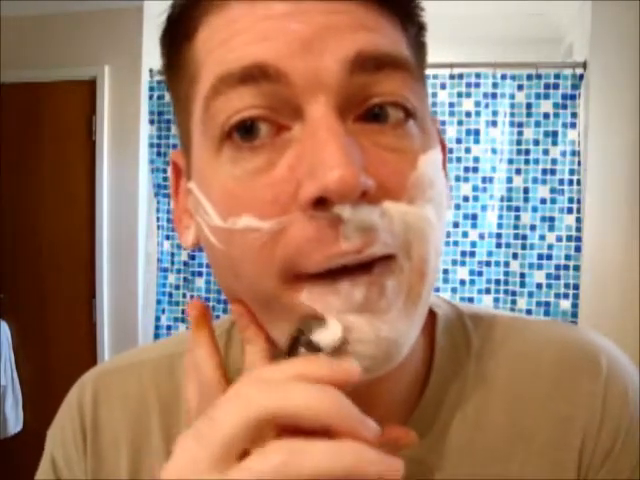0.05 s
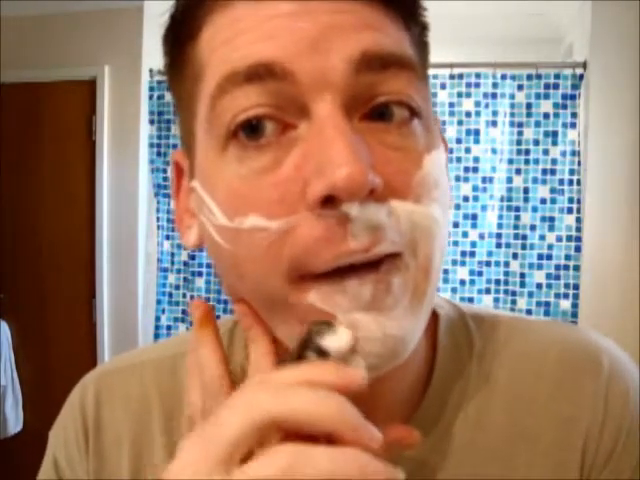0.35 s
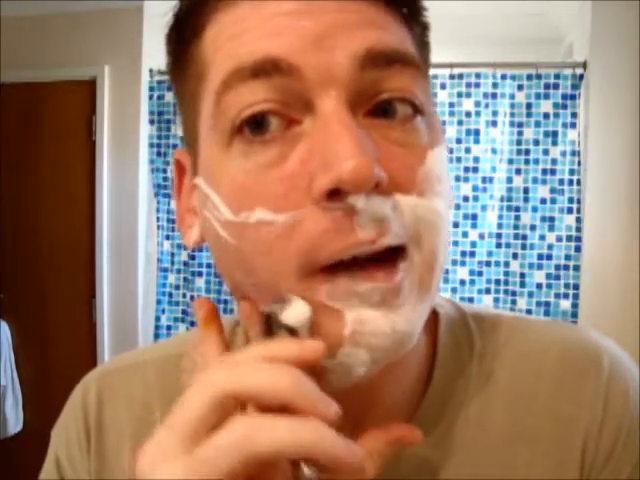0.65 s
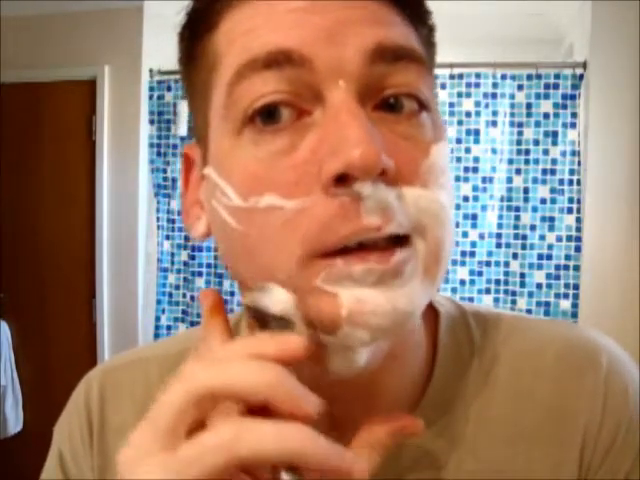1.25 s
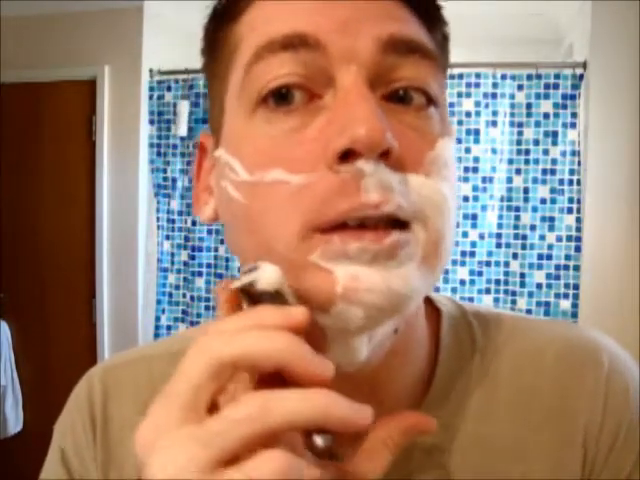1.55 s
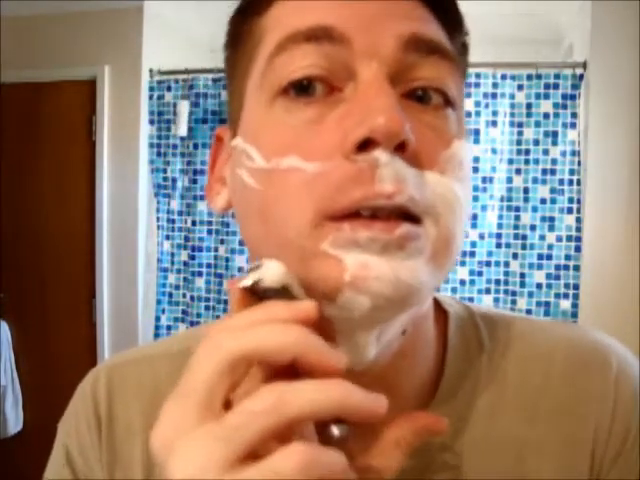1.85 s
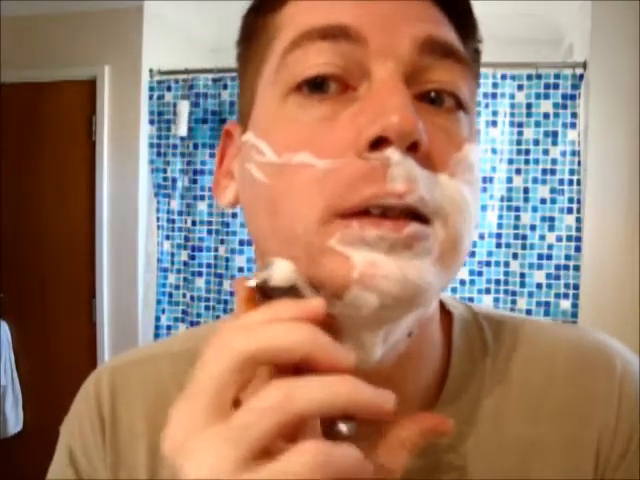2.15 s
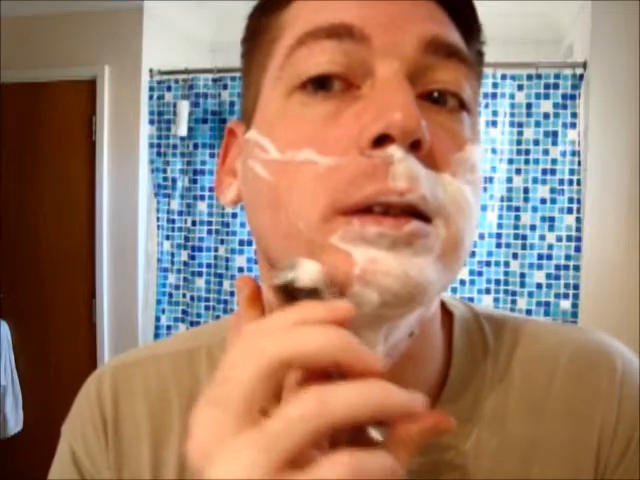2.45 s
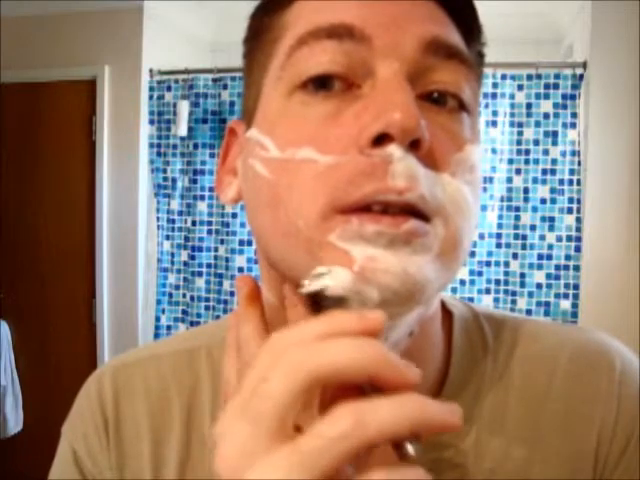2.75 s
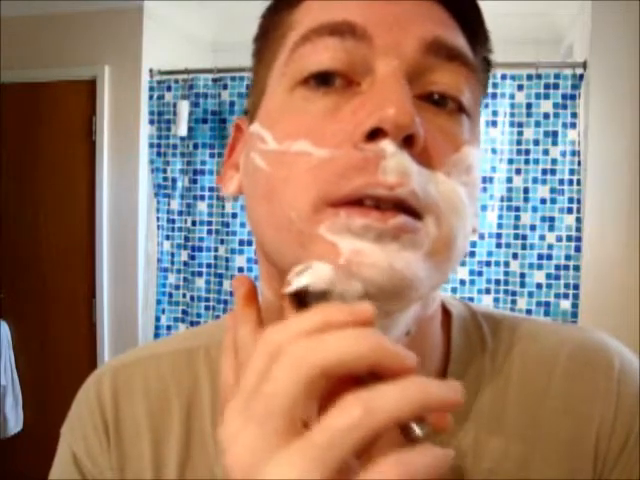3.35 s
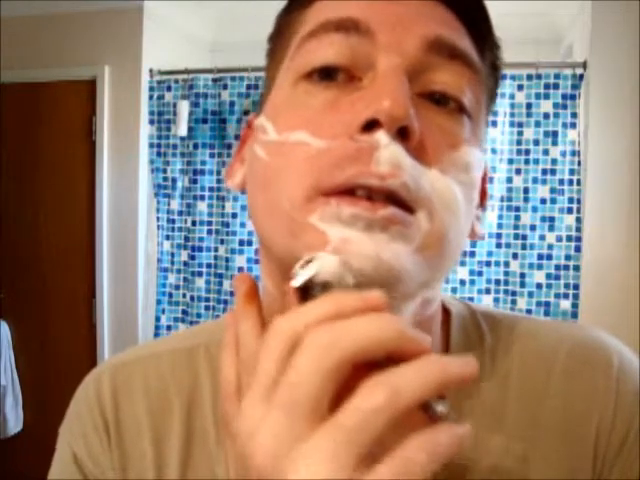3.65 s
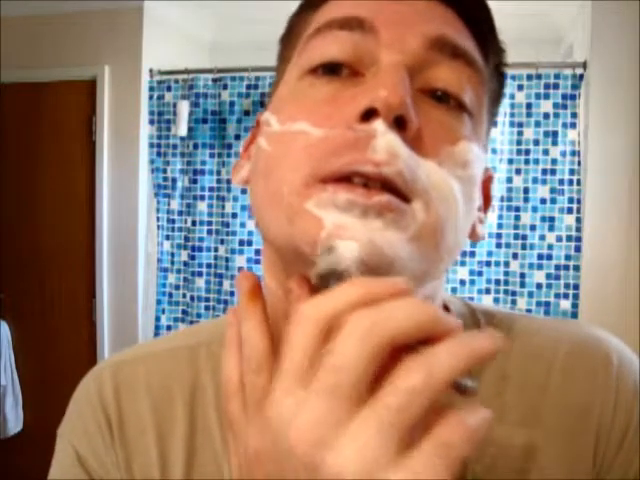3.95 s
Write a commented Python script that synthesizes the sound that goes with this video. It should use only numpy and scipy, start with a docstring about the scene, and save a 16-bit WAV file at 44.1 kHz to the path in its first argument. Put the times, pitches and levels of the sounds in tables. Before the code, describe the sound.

A razor scrapes lathered stubble in short, hissy strokes with tiny blade ticks, close to the microphone in a small tiled bathroom. The strokes lighten midway, then grow quicker and louder, while a ventilation fan hums throughout.

```python
"""Shaving in a small tiled bathroom, one microphone close to the razor. A ventilation fan hums and
blows from the start. Short strokes cross lathered stubble, each a dense run of hair snaps that hiss
and ring the razor head; the blade ticks where it catches, and the tiles add a short tail. A low rumble
swells before 1 s. Around 2 s the strokes are light and squeak faintly. Near 3 s the rumble swells
again, and the strokes, about four a second, grow to their loudest."""
import sys
import numpy as np
from scipy import signal
from scipy.fft import rfft, irfft
from scipy.io import wavfile

SR = 44100
rng = np.random.default_rng(int(sys.argv[2]) if len(sys.argv) > 2 else 0)


def transcribe(u):
    """Save the signal u as a 16-bit wav file named by the first command-line argument.

    u: samples, shape (n,) or (channels, n), limited to [-1, 1]; the rate is SR.
    q: integer samples, one column per channel.
    """
    v = np.clip(np.atleast_2d(u).T, -1, 1)
    q = np.round(v * 32767).astype(np.int16)
    wavfile.write(sys.argv[1], SR, q)


N = 176400
T, HZ = np.arange(N) / SR, np.fft.rfftfreq(N, 1 / SR)
TOP_HZ = 10090  # upper edge of everything the microphone hears


def amp(db):
    """Decibels to gain."""
    return 10 ** (np.asarray(db) / 20)


def unit(x):
    """Scales to rms 1."""
    return x / np.sqrt(np.mean(abs(x) ** 2) + 1e-20)


def colour(x, points):
    """Shapes x to rms 1 with a spectrum joined on a log-frequency axis and cut at TOP_HZ."""
    hz, db = np.transpose(points)
    gain = amp(np.interp(np.log(HZ + 1), np.log(hz), db))
    return unit(irfft(rfft(x) * gain * (HZ < TOP_HZ), N))


def drift(rate_hz):
    """Slow random motion of rms 1."""
    return unit(irfft(rfft(rng.standard_normal(N)) * np.exp(-(HZ / rate_hz) ** 2), N))


# Air through the fan, at the back of the room (frequency [Hz], relative level [dB])
AIR_SPECTRUM = [(22, -23), (40, -23), (60, -11), (80, -7.5), (108, -18), (124, -4.5), (140, -15), (163, -2),
                (185, -7), (210, -4.5), (232, 0), (260, 3), (285, -1.5), (380, -1.5), (450, -5.5),
                (620, -4.5), (780, -6), (1150, -12), (1400, -12), (2200, -14.5), (3200, -16.5), (5000, -19),
                (8000, -20.5), (10000, -22.5)]
def fan_air(level_db=-51.5, flicker_db=1.68, flicker_hz=93):
    """The fan blows an even rush of air whose treble flickers slightly."""
    air = colour(rng.standard_normal(N), AIR_SPECTRUM)
    treble = irfft(rfft(air) * (HZ > 5100), N)
    flicker = amp(flicker_db * drift(flicker_hz))
    return amp(level_db) * (air - treble + treble * flicker)


# Tones of the fan's motor and blades (frequency [Hz], rms level [dB], unsteadiness [0-1])
FAN_TONES = [ (43, -80, .7), (100, -71, .15), (200, -51.3, .05), (242.3, -58.2, .45), (300.3, -63.7, .2),
             (476, -73, .4), (500.3, -71.5, .3), (558, -73, .4), (600.3, -70.5, .3), (657, -64.7, .2),
             (757, -70.3, .45), ]
def fan_hum(waver_hz=4.5):
    """The motor and blades hum behind the razor, each tone wavering by its own amount."""
    hum = np.zeros(N)
    for hz, db, unsteady in FAN_TONES:
        wander = unit(drift(waver_hz) + 1j * drift(waver_hz))
        waver = np.sqrt(1 - unsteady ** 2) + unsteady * wander
        tone = np.exp(2j * np.pi * (hz * T + rng.random()))
        hum += amp(db) * unit((waver * tone).real)
    return hum


# A low rumble in the background (time [s], rms level [dB])
RUMBLE_LEVELS = [(0, -84), (.55, -78), (.65, -66), (1.05, -68), (1.2, -72.5), (2.85, -80.5), (2.99, -62),
                 (3.18, -71), (3.3, -73), (4, -73)]
def rumble(pitch_hz=74.9, wander_hz=3.14):
    """A low drone of wandering pitch that swells twice."""
    hz = pitch_hz + wander_hz * drift(12.7)
    level_db = np.interp(T, *np.transpose(RUMBLE_LEVELS))
    return amp(level_db) * unit(np.sin(2 * np.pi * np.cumsum(hz) / SR))


def tile_echo(x, t60_s=.25, level_db=-13.5):
    """The tiled walls return a short, dense tail, reaching the microphone 4 ms after the direct sound."""
    t = T[:SR // 2]
    tail = rng.standard_normal(len(t)) * amp(-60 * t / t60_s) * (t > .004)
    return amp(level_db) * signal.fftconvolve(x, tail / np.linalg.norm(tail))[:N]


# Faint squeaks on the light strokes (start [s], length [s], level [dB])
BLADE_SQUEAKS = [(1.915, .048, -59.5), (2.205, .065, -61), (2.468, .06, -62)]
def squeak(start, length, level_db, pitch_hz=5750, jitter_hz=90, flutter_hz=220, rough_db=3):
    """On a light stroke the blade chatters at one thin, unsteady pitch."""
    hz = pitch_hz + jitter_hz * drift(flutter_hz)
    arch = np.sqrt(abs(np.sin(np.pi * np.clip((T - start) / length, 0, 1))))
    tone = np.sin(2 * np.pi * np.cumsum(hz) / SR) * amp(rough_db * drift(flutter_hz))
    return amp(level_db) * arch * unit(tone)


def hair_snaps(fine_per_s=7000, thick_per_s=450, thick_db=-7, spread_db=3.3, drag_db=1.5, drag_s=.007):
    """A dense run of tiny hair snaps of uneven size, with a few thick hairs cracking among them."""
    sizes = amp(spread_db * np.minimum(rng.exponential(1, N), 3.5))
    signs = rng.choice([-1, 1], N)
    fine = unit(signs * sizes * (rng.random(N) < fine_per_s / SR))
    thick = unit(signs * (rng.random(N) < thick_per_s / SR))
    drag = amp(drag_db * drift(1 / drag_s))
    return unit((fine + amp(thick_db) * thick) * drag)


# Modes of the razor head (frequency [Hz], width [Hz], relative level [dB])
HEAD_MODES = [(3560, 220, 2.5), (4270, 100, 1.5), (4680, 160, 2), (5270, 110, -2), (5830, 240, 2),
              (6200, 200, -3.5), (7380, 130, 0), (8680, 200, -6), (9560, 220, -2.5)]
def head_ring(snaps):
    """The snaps set the razor head ringing at its modes."""
    modes = sum(amp(db) / (1 + ((HZ - hz) / width) ** 2) ** 2 for hz, width, db in HEAD_MODES)
    return unit(irfft(rfft(snaps) * modes, N))


# Colour of a hair snap at the microphone (frequency [Hz], relative level [dB])
SNAP_SPECTRUM = [(600, -21), (1400, 0.5), (2400, -1), (3200, 1.5), (4300, 0), (5600, 0), (7000, 0),
                 (8500, -3), (9800, -3)]
def stubble_scrape(snaps):
    """Thousands of snaps a second merge into a hiss."""
    return colour(snaps, SNAP_SPECTRUM)


# The blade catches and rings part of the head (start [s], level [dB], centre [Hz], fade [s])
BLADE_CATCHES = [(0.249, -53.5, 5450, .003), (.2622, -54.5, 5370, .007), (.2734, -50, 5200, .002),
                 (.284, -56, 4160, 0.009), (.2994, -52, 5350, .002), (.6185, -52.5, 3800, .0025),
                 (1.5484, -51, 5850, 0.0018), (1.5613, -47.5, 5950, 0.0018), (2.5184, -52, 5530, .0015),
                 (2.7267, -55, 4690, .0025), (2.7424, -46, 5200, 0.0025), (2.9488, -52, 5400, .0025),
                 (2.962, -49, 4560, 0.0023), (3.1914, -49, 5800, .002), (3.2003, -46, 6150, 0.0028),
                 (3.219, -54, 3520, .004), (3.455, -53, 5900, .005), (3.485, -55.5, 3600, 0.0076),
                 (3.6795, -48, 5600, .002), (3.684, -54.5, 3230, 0.014), (3.9235, -52, 4330, .002),
                 (3.9374, -47, 5850, .002), (3.958, -52, 5700, .005), (3.981, -50.5, 5800, .008)]
def catch(contact_spectrum, start, level_db, centre_hz, fade, rise_s=.0008):
    """A tick or brief rasp as the blade hooks a tuft of stubble; the shorter, the wider its band."""
    t = np.maximum(T - start, 0)
    width_oct = .38 * np.sqrt(.002 / fade)
    band = (HZ < TOP_HZ) / (1 + (np.log2((HZ + 1) / centre_hz) / width_oct) ** 2) ** 2
    envelope = np.minimum(t / rise_s, 1) * np.exp(-t / fade)
    rasp = envelope * irfft(contact_spectrum * band, N)
    return amp(level_db) * np.sqrt(fade * SR / N) * unit(rasp)  # energy of level_db held for one fade


# Razor strokes, close to the microphone
# (start [s], length [s], release [s], level [dB], brightness [dB/octave], ring against scrape [dB])
RAZOR_STROKES = [ (-0.02, 0.075, .021, -53.5, 2.5, -21), (0.246, 0.06, 0.02, -55.5, -1, -14),
                 (0.313, 0.034, 0.032, -56.5, 3.5, -15), (0.608, 0.092, .028, -53, 4, -23),
                 (1.038, 0.072, .021, -58.5, 3.5, -15), (1.565, 0.088, .021, -63.5, 1, -4),
                 (1.902, 0.083, .021, -62, 1, -13), (2.19, 0.09, .018, -58, 2.5, -6),
                 (2.46, 0.073, .016, -57.3, 1.5, -11), (2.708, 0.055, 0.028, -54, 2.5, -6),
                 (2.945, 0.055, 0.043, -55, 3, 0), (3.183, 0.022, .005, -51.5, 5, 0),
                 (3.202, 0.026, 0.041, -49, 2, -7), (3.422, 0.077, 0.032, -51.5, 2.5, -8),
                 (3.669, 0.05, .042, -50.5, 1, -4.5), (3.922, 0.1, .03, -50.5, 0, -2), ]
def stroke(scrape, ring, start, length, release, level_db, bright_db, ring_db, attack_s=.015):
    """The blade scrapes and the head rings while the razor presses on the skin, then both taper off."""
    t = T - start
    press = np.clip(t / attack_s, 0, 1) * np.exp(-np.maximum(t - length, 0) / release)
    arch = .7 + .3 * np.sin(np.pi * np.clip(t / (length + release), 0, 1))
    tilt = amp(bright_db * np.log2(np.maximum(HZ, 2000) / 5000)) * (HZ < TOP_HZ)
    hiss = unit(irfft(rfft(scrape + amp(ring_db) * ring) * tilt, N))
    return amp(level_db) * press * arch * hiss


def razor():
    """The razor's direct sound: strokes through the stubble, catches and squeaks."""
    snaps, grabs = hair_snaps(), hair_snaps()
    scrape, ring = stubble_scrape(snaps), head_ring(snaps)
    contact_spectrum = rfft(grabs + .23 * head_ring(grabs))
    strokes = sum(stroke(scrape, ring, *row) for row in RAZOR_STROKES)
    catches = sum(catch(contact_spectrum, *row) for row in BLADE_CATCHES)
    squeaks = sum(squeak(*row) for row in BLADE_SQUEAKS)
    return strokes + catches + squeaks


def scene():
    """One microphone: the razor in front, tiles all round, fan and rumble behind."""
    shave = razor()
    return (shave + tile_echo(shave) + fan_hum() + fan_air() + rumble())[None]


def record(dry):
    """The recorder cuts off steeply at TOP_HZ."""
    lowpass = signal.firwin(801, TOP_HZ, window=("kaiser", 8), fs=SR)
    return signal.oaconvolve(dry, lowpass[None], "same")


dry = scene()
out = record(dry)
transcribe(out)
```